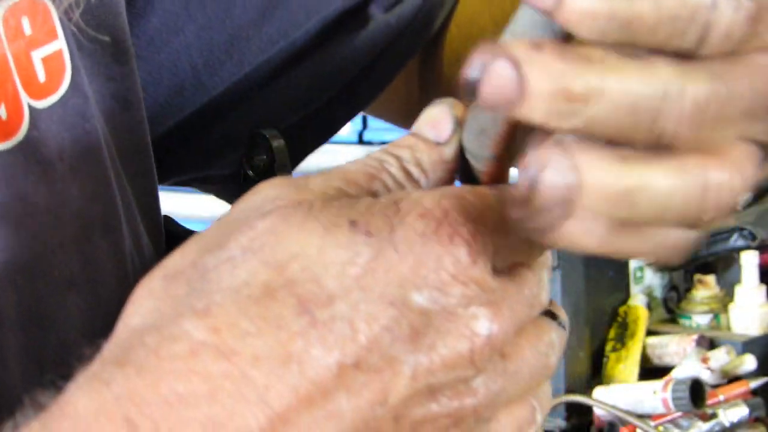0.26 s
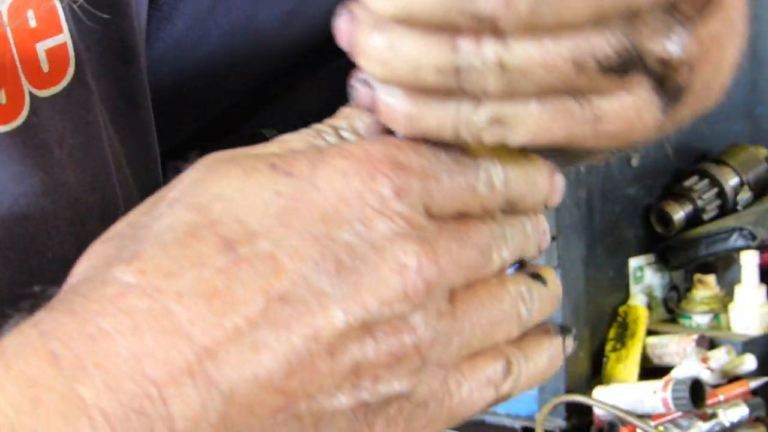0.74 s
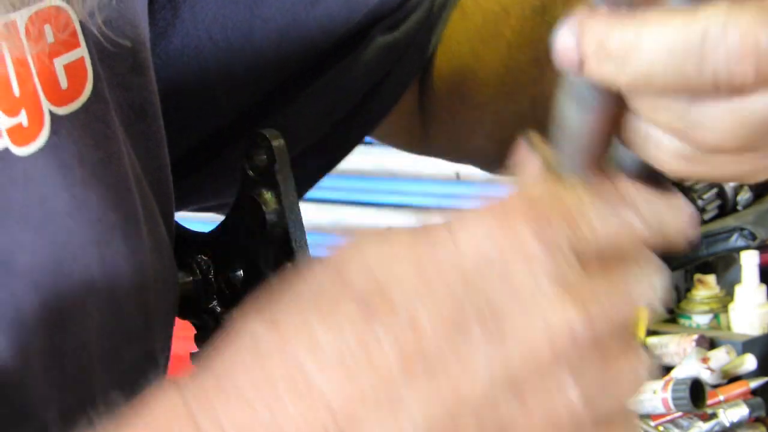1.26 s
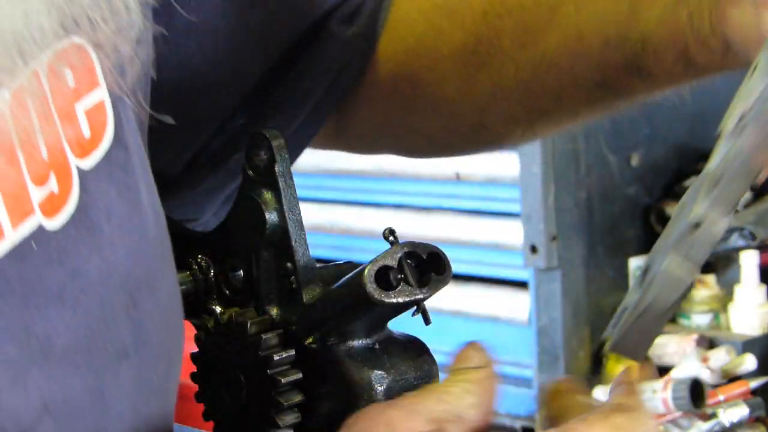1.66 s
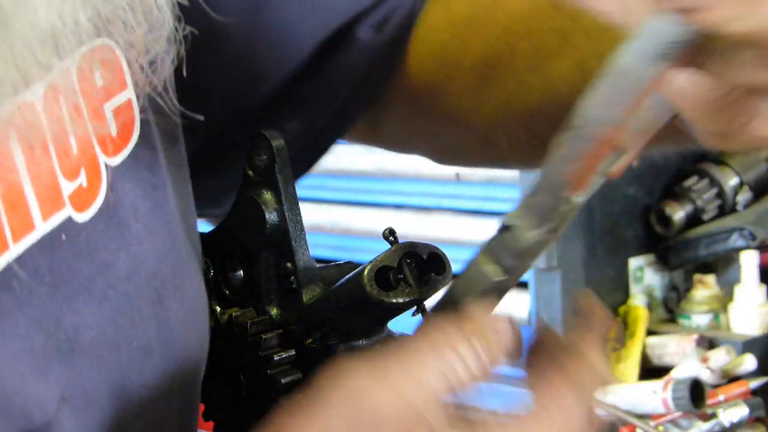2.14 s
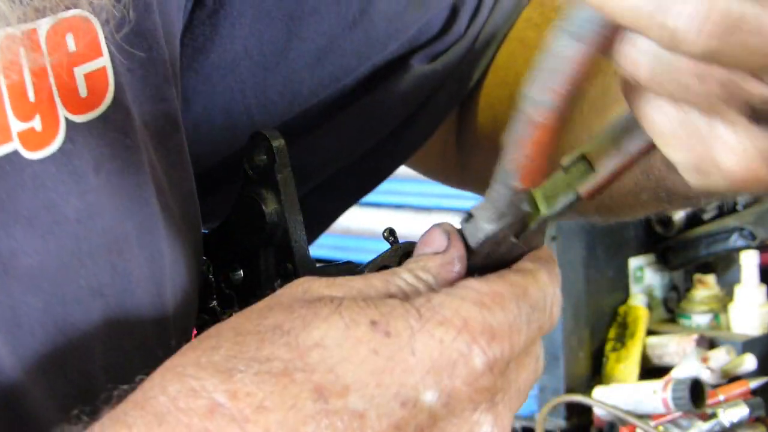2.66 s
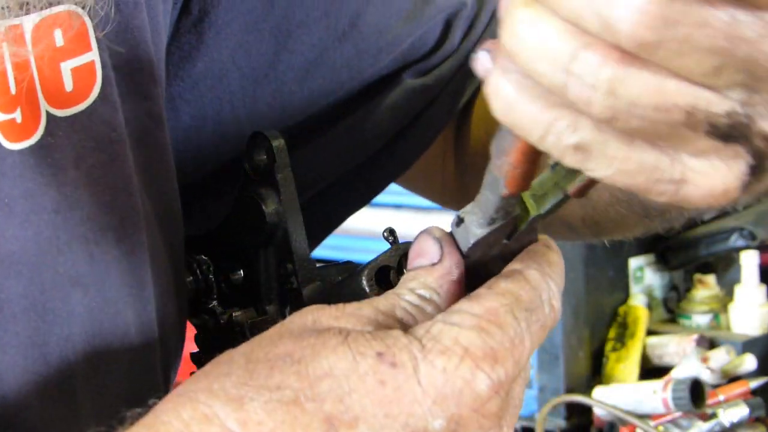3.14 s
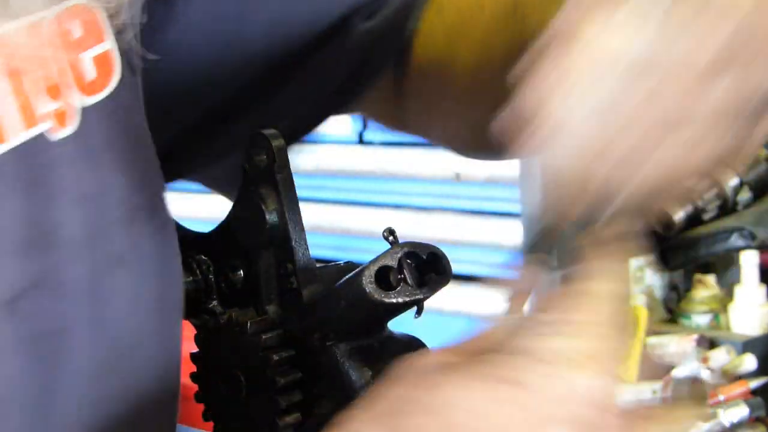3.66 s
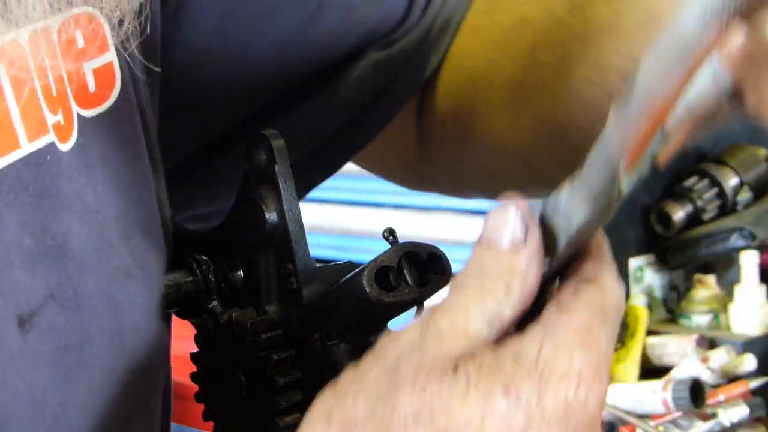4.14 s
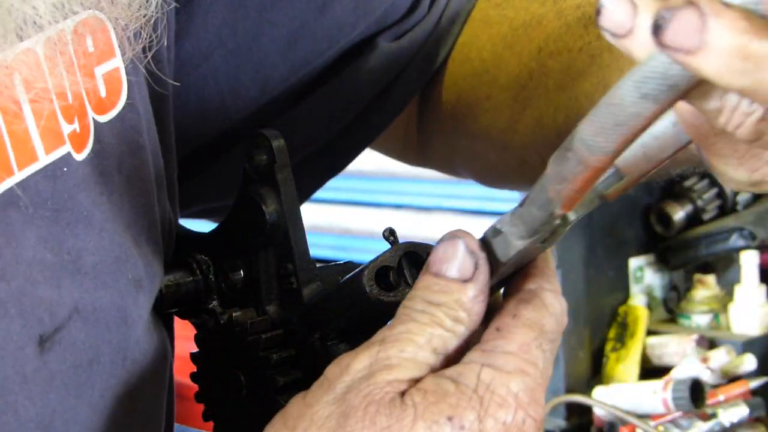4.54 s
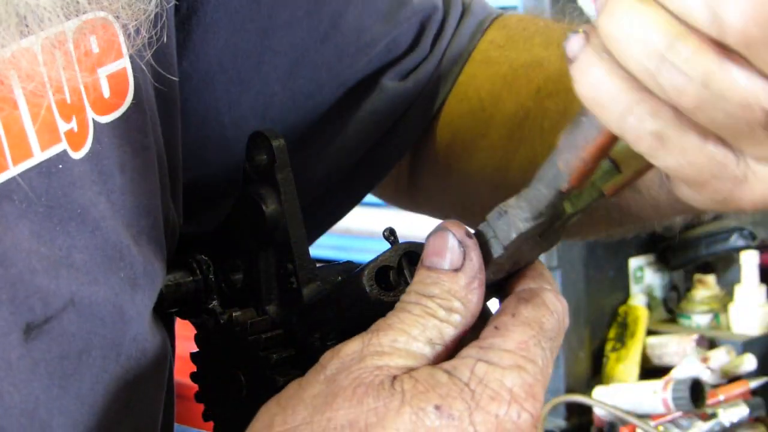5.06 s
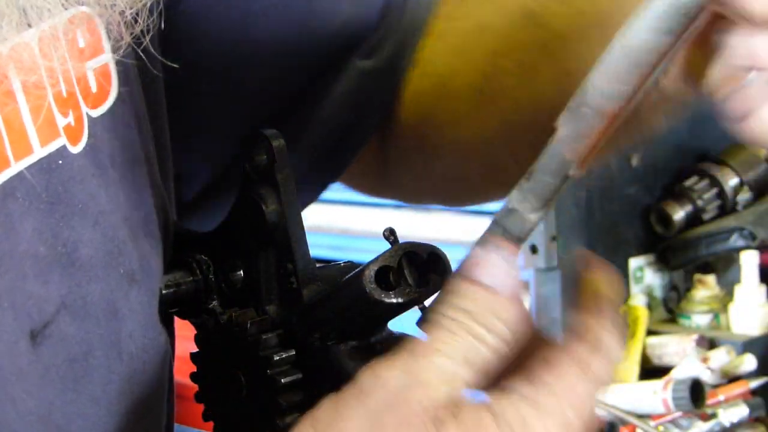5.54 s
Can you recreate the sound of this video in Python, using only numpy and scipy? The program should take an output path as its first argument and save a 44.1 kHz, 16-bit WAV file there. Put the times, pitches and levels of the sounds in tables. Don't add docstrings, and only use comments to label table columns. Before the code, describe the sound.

Pliers snap off a steel pin with sharp metallic cracks, then clack onto a bench in an echoing shed, over a thin insect whine.

```python
import sys
import numpy as np
from scipy import signal
from scipy.fft import rfft, irfft
from scipy.io import wavfile

SR = 44100
rng = np.random.default_rng(int(sys.argv[2]) if len(sys.argv) > 2 else 0)


def unload_wav(signal):
    wavfile.write(
        sys.argv[1],
        SR,
        np.round(np.clip(np.atleast_2d(signal).T, -1, 1) * 32767).astype(np.int16),
    )


def attenuation_scalar(level_db):
    decades = np.asarray(level_db, float) / 20
    return 10 ** decades


N = 256203


def on_log(table, hz):
    f, v = np.transpose(table)
    return np.interp(np.log(np.maximum(hz, 1)), np.log(f), v)


def unit(x):
    return x / np.sqrt(np.mean(x ** 2))


def colour(x, table):
    gain = attenuation_scalar(on_log(table, np.fft.rfftfreq(len(x), 1 / SR)))
    return irfft(rfft(x) * gain, len(x))


def band(x, lo_hz, hi_hz):
    edges = [lo_hz, min(hi_hz, .45 * SR)]
    return signal.sosfilt(signal.butter(2, edges, "band", fs=SR, output="sos"), x)


def add(out, s, x, pan_db):
    i = max(int(s * SR), 0)
    x = x[:N - i]
    out[:, i:i + len(x)] += x * attenuation_scalar(np.array([[pan_db], [-pan_db]]) / 2)


# t/s, peak level/dB, centre f/Hz, spread/octaves
TOUCHES = [(0.0878, -40.5, 3000, 0.81), (.0955, -48, 8500, .4), (.3596, -48, 8000, 1.1),
           (0.9679, -51, 4400, 0.89), (1.302, -39, 6800, 0.63), (2.3316, -41, 5900, 0.56),
           (2.362, -51, 8000, .8), (2.3815, -42, 9250, 0.13), (2.5676, -43, 3500, 0.31),
           (2.604, -54, 11000, .5), (2.8095, -52, 3980, 1.1), (2.8305, -46, 9000, 0.73),
           (2.851, -49, 2970, 0.13), (4.539, -42, 9000, 0.84), (4.9721, -45, 4540, .6)]
# t/s, peak level/dB, centre f/Hz
GRAZES = [
    (0.9514, -20, 6000),
    (0.9595, -26, 5400),
    (3.5974, -31.5, 2180),
    (3.6028, -27, 10000),
    (3.6158, -34, 5000),
    (5.3014, -28, 8000),
]
# t/s, peak level/dB, centre f/Hz, spread/octaves, t60 at 4 kHz/ms
SLIPS = [
    (0.9648, -11.5, 6450, 0.45, 36),
    (0.9656, -15, 5100, 1.23, 29),
    (2.6343, -28, 3350, 0.39, 35),
    (2.642, -38, 3230, 0.85, 78),
    (3.6195, -3.05, 6540, 0.76, 20),
    (4.6326, -35, 3050, 0.61, 60),
    (5.308, -10.5, 6370, 1.1, 12),
    (5.3111, -17.5, 3980, 0.9, 63),
]


def contacts():
    touches = [(*r, 18, -.3) for r in TOUCHES]
    grazes = [(*r, 1, 25, -8) for r in GRAZES]
    slips = [(*r, 2.1) for r in SLIPS]
    return sorted(touches + grazes + slips)


def jaws(count=64):
    dull_hz, rise_s, wet_db = 12800, 0.000067, .5
    near, walls = np.zeros((2, N)), np.zeros((2, N))
    t = np.arange(SR // 18) / SR
    events = contacts()
    draws = rng.random((len(events), 2, count, 1))
    for (s, peak_db, centre_hz, spread, t60_ms, pan_db), (place, phase) in zip(events, draws):
        hz = 1200 + 15000 * ((np.arange(count)[:, None] + place) / count) ** 1.3
        gain = np.exp(-.5 * (np.log2(hz / centre_hz) / spread) ** 2 - (hz / dull_hz) ** 3)
        decay = np.exp(-np.log(1000) * t * 1000 / (t60_ms * (4000 / hz) ** .5))
        x = np.sum(gain * decay * np.sin(2 * np.pi * (hz * t + phase)), axis=0)
        x *= 1 - np.exp(-t / rise_s)
        x *= attenuation_scalar(peak_db) / np.abs(x).max()
        pulse = np.cos(2 * np.pi * hz * (t[:64] - t[32]))
        even = np.sum(gain * (4000 / hz) ** .25 * pulse, axis=0) * np.hanning(64)
        add(near, s, x, pan_db)
        add(walls, s, even * np.linalg.norm(x) / np.linalg.norm(even), 0)
    return np.array([near, walls * attenuation_scalar(wet_db)])


def strikes(events, modes, scatter_db, detune, pan_db, wet_db=0):
    wall_ring = 0.42
    hz, db, t60 = (c[:, None] for c in np.transpose(modes))
    near, walls = np.zeros((2, N)), np.zeros((2, N))
    t = np.arange(SR // 4) / SR
    octaves = np.log2(hz / hz[np.argmax(db)])
    draws = rng.standard_normal((len(events), 3, len(modes), 1))
    for (s, peak_db, tilt_db, rise_ms, ring), (level, shift, sign) in zip(events, draws):
        gain = np.sign(sign) * attenuation_scalar(db + tilt_db * octaves + scatter_db * level)
        tones = gain * np.sin(2 * np.pi * hz * (1 + detune * shift) * t)
        fade = -np.log(1000) * t / (t60 * ring)
        x = np.sum(tones * np.exp(fade), axis=0) * (1 - np.exp(-t * 1000 / rise_ms))
        x *= attenuation_scalar(peak_db) / np.abs(x).max()
        blur = np.sum(tones * np.exp(fade / wall_ring), axis=0)
        blur *= 1 - np.exp(-t * 1000 / rise_ms / wall_ring)
        blur = band(blur, hz.min() * 0.73, hz.max() * 2.1)
        add(near, s, x, pan_db)
        add(walls, s, blur * np.linalg.norm(x) / np.linalg.norm(blur), 0)
    return np.array([near, walls * attenuation_scalar(wet_db)])


# t/s, peak level/dB, tilt/(dB per octave), rise/ms, ring time factor
SNAPS = [
    (.9645, -10.5, 9.5, 0.33, 1.3),
    (3.6205, -1.5, 3, 0.32, 0.54),
]
# f/Hz, level/dB, t60/s
PIN_MODES = [(1710, -24.5, 0.013), (4004, -13, 0.016), (8800, -17, 0.0055)]


def pin():
    first_try_until_s, first_try_db = 1.2, 2
    near = strikes(SNAPS, PIN_MODES, 0, 0, -3.5)[0]
    first_try = np.arange(N) < first_try_until_s * SR
    walls = band(near, 3760, 4200) * attenuation_scalar(-10.5 + first_try_db * first_try)
    return np.array([near, walls])


# t/s, length/s, rms level/dB, low edge f/Hz, high edge f/Hz
RUBS = [(0.352, .03, -62, 4000, 13000), (1.292, 0.035, -60, 2520, 13900), (1.423, .06, -64, 7000, 13000),
        (2.334, 0.12, -60.5, 5000, 11600), (2.552, 0.19, -57, 2500, 11000),
        (2.756, 0.12, -57.5, 1000, 10600), (3.268, 0.19, -52.5, 1500, 10100),
        (3.269, 0.26, -54.5, 152, 1810), (4.09, 0.11, -61, 6950, 11900), (4.218, 0.059, -58, 7000, 14300),
        (4.774, .05, -59, 2000, 10000), (4.699, 0.15, -54, 346, 890), (2.701, 0.27, -61.5, 360, 890),
        (5.143, 0.068, -64, 10000, 14500)]


def rubs():
    out = np.zeros((2, N))
    for s, length, db, lo_hz, hi_hz in RUBS:
        u = np.linspace(0, 1.5, int(length * SR))
        slips = rng.standard_normal(SR // 2) * attenuation_scalar(3.7 * rng.exponential(size=SR // 2))
        slips = band(band(slips[:len(u)], lo_hz, hi_hz), lo_hz / 2, hi_hz)
        swell = np.minimum(u / 0.056, 1) * np.exp(-(u / 1.31) ** 4)
        add(out, s, unit(slips) * attenuation_scalar(db) * swell, 0)
    return np.array([out, out])


# t/s, peak level/dB, tilt/(dB per octave), rise/ms
BUMPS = [
    (.0, -44, -4, 8.1),
    (.045, -42.5, -24, 8),
    (.089, -32, 1.5, 3.8),
    (1.376, -48.5, 3, 2.3),
    (2.332, -46, 9, 2.5),
    (2.364, -37.5, -11.5, 16),
    (2.55, -44, -21, 5.6),
    (2.568, -37, -18, 28),
    (4.542, -34.5, -12, 4),
    (5.745, -44.5, -12, 3),
]
# t/s, peak level/dB, tilt/(dB per octave), rise/ms
PRESSES = [(2.635, -25, -7, 14), (2.646, -23.5, -6.5, 8.2), (2.717, -48, -15, 7), (2.757, -39, -12, 6.9),
           (2.785, -36.5, -13, 2.8), (2.812, -36.5, -13, 6), (2.85, -42, 5, 4), (4.632, -30, -6, 6.6),
           (4.643, -28.5, -4.5, 6.2), (4.702, -38, -17, 3.5), (4.715, -39, -15, 4.6),
           (4.755, -45, -18, 9.3), (4.775, -43.5, -12, 6.8), (4.792, -41, -18, 3.6), (4.897, -44, -3, 2.7)]
# f/Hz, level/dB, t60/s
CASTING_MODES = [(340, -21.5, 0.045), (480, -1, 0.017), (551, -6, 0.043), (626, -1.5, 0.057),
                 (659.2, -5.5, 0.09), (815, 3, 0.023), (1076, -10.5, 0.053), (1300, -2, 0.026),
                 (1500, -8, 0.047)]


def casting():
    loose_ring, held_ring = 1.7, 0.75
    loose = [(*r, loose_ring) for r in BUMPS]
    held = [(*r, held_ring) for r in PRESSES]
    iron = strikes(loose, CASTING_MODES, 0.47, 0.012, 1, wet_db=-1.6)
    return iron + strikes(held, CASTING_MODES, 1.7, 0.015, 3, wet_db=-1.6)


# t/s, peak level/dB, tilt/(dB per octave), rise/ms, ring time factor
JERKS = [
    (.953, -27, -4, 3.7, 1),
    (.9665, -17.5, 0, 0.75, 0.44),
    (3.599, -25.5, 0, 9.5, 0.9),
    (3.622, -23.5, -2, 2.4, 0.47),
    (3.628, -23.5, -1, 9.1, 0.26),
]
# f/Hz, level/dB, t60/s
HANDLE_MODES = [(354, -7, 0.039), (528, -14, 0.025), (599, 4, 0.05), (742, -12, 0.18), (1000, -1.5, 0.039),
                (1407, -4, 0.056), (1812, -8, 0.072)]


def handles():
    return strikes(JERKS, HANDLE_MODES, 1.5, 0.056, 4.5, wet_db=1)


# t/s, peak level/dB, tilt/(dB per octave), rise/ms, ring time factor
KNOCKS = [
    (5.3083, -11.5, 6, 1, 1.93),
    (5.3128, -10, 5.5, 0.47, 0.42),
]
# f/Hz, level/dB, t60/s
BENCH_MODES = [(324, -13.5, 0.09), (454, -5, 0.02), (542, -5.5, 0.037), (686, -4.5, 0.12),
               (815, -3.5, 0.058), (960, -24, 0.14), (1190, -19, 0.0094), (1337, -7, 0.051),
               (1384, -5, 0.049), (1665, -12.5, 0.018), (2420, -29, 0.038)]


def bench():
    return strikes(KNOCKS, BENCH_MODES, 0.71, 0.0026, 0, wet_db=0.6)


# t/s, peak level/dB, tilt/(dB per octave), rise/ms, ring time factor
THUMPS = [
    (.968, -39.5, 0.5, 17, 0.9),
    (3.626, -47.5, -1, 6.2, 2.7),
    (5.312, -40, -2.5, 3.6, 0.92),
]
# f/Hz, level/dB, t60/s
FRAME_MODES = [(122.9, -9.5, 0.29), (167, -8, 0.32), (226, -8, 0.18), (300, 0.5, 0.26), (468.6, -6, 0.75)]


def frame():
    near = strikes(THUMPS, FRAME_MODES, 1.5, 0.039, 0)[0]
    return np.array([near, near])


# f/Hz, t60/s
SHED_T60 = [(100, 0.54), (500, 0.88), (1300, 0.97), (4000, 0.98), (8000, 0.72), (13000, 0.43)]
# f/Hz, level/dB
SHED_COLOUR = [(100, 18.5), (500, 6), (1300, 8), (2500, 3.5), (4000, 5), (6000, 4), (8500, 5), (11000, 3.5),
               (15000, -2)]
SHED_DB = -11


def shed(x):
    wall_s, wall_db, side_db = .0235, -16, -6.5
    t = np.arange(SR) / SR
    edges = 70 * 2 ** np.arange(0, 8.2, .25)
    noise = rng.standard_normal((2, SR))
    tail = np.zeros((2, SR))
    for lo, hi in zip(edges, edges[1:]):
        tail += band(noise, lo, hi) * attenuation_scalar(on_log(SHED_COLOUR, lo) - 60 * t / on_log(SHED_T60, lo))
    early = 3.2 * (1 - np.exp(-t / 0.0013))
    late = 1 / (1 + np.exp((wall_s - t) / 0.0021))
    tail *= early + late
    tail *= attenuation_scalar(SHED_DB) / np.sqrt(np.sum(tail[0] ** 2))
    clutter = noise[1] * np.exp(-((t - wall_s) / 0.0011) ** 2)
    tail[0] += attenuation_scalar(wall_db) * band(clutter / np.linalg.norm(clutter), 5500, 10000)
    mid, side = signal.fftconvolve(x.mean(axis=0)[None], tail, axes=1)[:, :N]
    side = attenuation_scalar(side_db) * side
    return np.array([mid + side, mid - side])


# t/s, length/s, start f/Hz, upper partial level/dB, level/dB of the fundamental an octave down
CHIRPS = [
    (0.887, 0.049, 4350, -51, -72),
    (1.747, .046, 4250, -50.5, -53),
    (2.737, 0.04, 4380, -51, -53),
    (3.852, 0.033, 4200, -59, -51),
    (4.899, 0.04, 3980, -51.5, -50.5),
]


def bird():
    rise_octaves, bend = 0.53, 1.5
    out = np.zeros((2, N))
    for s, length, start_hz, db, low_db in CHIRPS:
        u = np.linspace(0, 1, int(length * SR))
        phase = 2 * np.pi * np.cumsum(start_hz * 2 ** (rise_octaves * u ** bend)) / SR
        partials = attenuation_scalar(db) * np.sin(phase) + attenuation_scalar(low_db) * u ** 1.46 * np.sin(phase / 2)
        flutter = 1 + .3 * np.sin(2 * np.pi * 170 * u * length)
        add(out, s, np.sin(np.pi * u ** 1.6) * partials * flutter, 4.5)
    return out


# t/s, level/dB
CHORUS = [(0.0, -50), (1.13, -51), (1.36, -51.5), (2.832, -52), (3.11, -49.5), (3.56, -51.5), (3.79, -49.5),
          (4.12, -51.5), (4.69, -51), (5.21, -52), (5.5, -51), (5.81, -51.5)]
# f/Hz, width/Hz, level/dB
TYMBAL = [(7310, 296, -7.5), (7825, 180, -12), (6913, 410, -12.5), (7750, 1230, -13)]


def insects(count=8):
    out = np.zeros((2, N))
    for k, (rate, side) in enumerate(rng.random((count, 2))):
        hz, width, db = TYMBAL[k % len(TYMBAL)]
        gaps = SR / (370 + 160 * rate) * (1 + .25 * rng.standard_normal(4000))
        at = np.cumsum(gaps)
        inside = at < N
        clicks = np.bincount(at[inside].astype(int), rng.standard_normal(4000)[inside], N)
        whine = unit(band(clicks, hz - width / 2, hz + width / 2))
        out += attenuation_scalar(db) * whine * (1 + 0.47 * (2 * side - 1) * np.array([[1], [-1]]))
    s, db = np.transpose(CHORUS)
    return unit(out) * attenuation_scalar(np.interp(np.arange(N) / SR, s, db))


# f/Hz, level/dB per Hz
AIR = [(20, -5), (60, -14.5), (125, -2), (300, -3), (870, -2.5), (1570, -6.5), (2140, -11.5), (4000, -11),
       (5850, -10), (9100, -15), (12000, -19.5), (14700, -30.5), (16500, -14)]
# f/Hz, side minus mid level/dB
AIR_SIDE = [(60, -13), (110, -14), (200, -1.5), (380, 2.5), (700, 3.5), (1290, -3), (2380, -2), (4400, -5),
            (8120, -1), (15000, -1.5)]


def air():
    mid, side = (colour(rng.standard_normal(N), AIR) for _ in range(2))
    side = colour(side, AIR_SIDE)
    return attenuation_scalar(-55.5) / np.std(mid) * np.array([mid + side, mid - side])


def scene():
    song = bird()
    outdoors = insects() + air()
    near, walls = jaws() + pin() + rubs() + casting() + handles() + bench() + frame()
    wet = shed(walls + song * attenuation_scalar(2 - SHED_DB))
    return near + song + wet + outdoors


def roll_off(x):
    return signal.sosfilt(signal.butter(12, 16470, fs=SR, output="sos"), x)


def record(dry):
    full, top_hz, offset = .86, 15700, -.0035
    top = signal.ellip(8, .2, 60, top_hz, fs=SR, output="sos")
    mix = signal.sosfilt(top, np.clip(dry, -full, full)) + offset
    return roll_off(mix)


dry = scene()
out = record(dry)
unload_wav(out)
```